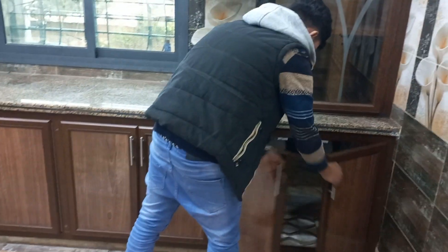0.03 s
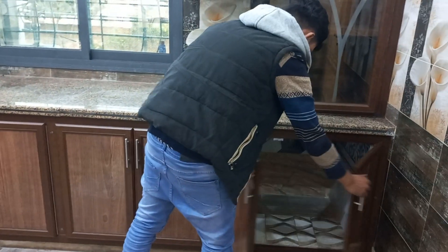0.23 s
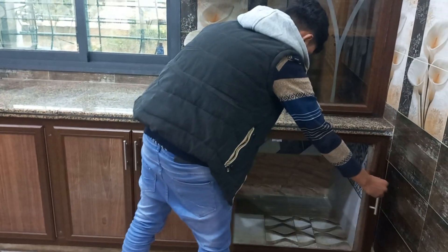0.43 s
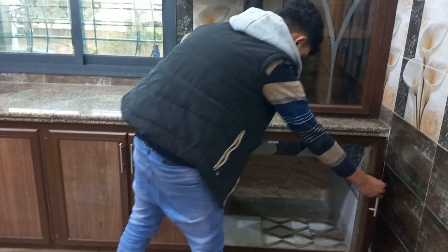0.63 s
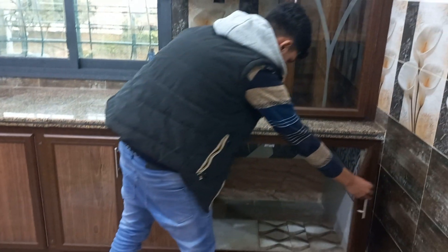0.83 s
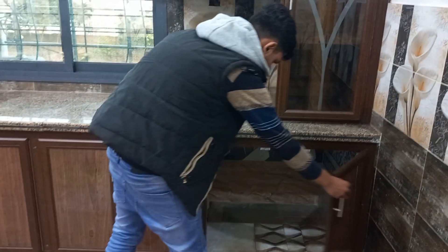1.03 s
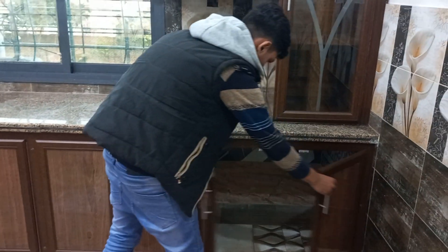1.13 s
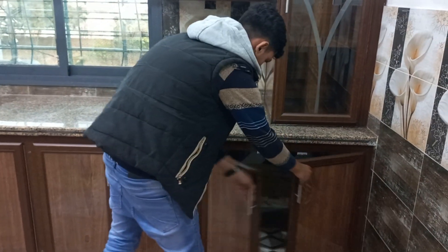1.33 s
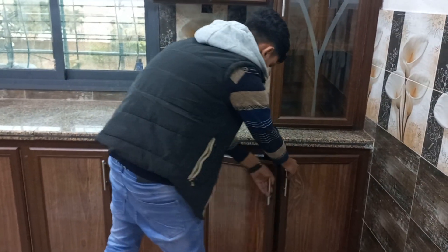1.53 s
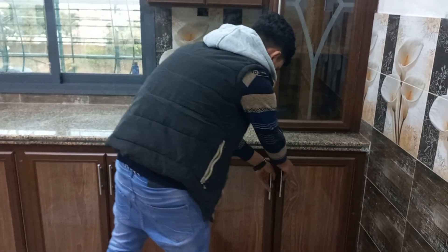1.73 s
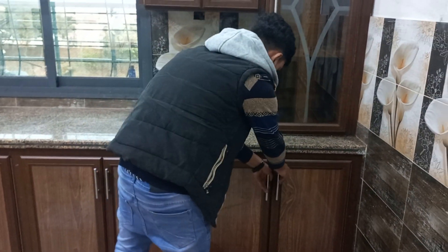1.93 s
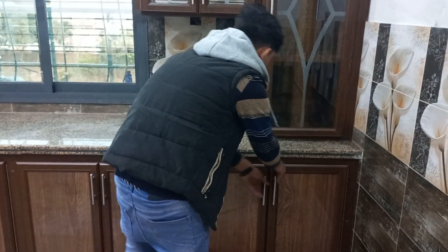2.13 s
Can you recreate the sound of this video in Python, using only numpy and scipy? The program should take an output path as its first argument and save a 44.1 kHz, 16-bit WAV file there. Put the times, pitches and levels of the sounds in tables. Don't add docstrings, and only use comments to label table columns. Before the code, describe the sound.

Cabinet doors bang open, then scrape and snap shut in quick succession in a bare tiled kitchen.

```python
import sys
import numpy as np
from scipy import signal
from scipy.fft import rfft, irfft, next_fast_len
from scipy.io import wavfile
from scipy.ndimage import uniform_filter1d

SR = 44100
rng = np.random.default_rng(int(sys.argv[2]) if len(sys.argv) > 2 else 0)


def pcm_store(signal):
    levels = np.round(np.clip(np.atleast_2d(signal), -1, 1) * 32767)
    wavfile.write(sys.argv[1], SR, levels.astype(np.int16).T)


def convert_level_to_amplitude(level_db):
    exponent = np.asarray(level_db, float) / 20
    return 10 ** exponent


N = 96579
LEAD = 8192

# t/s, crack level/dB, thud level/dB, ring level/dB, swell/s
BLOWS = [
    (-.08, -50, -42, -35.5, 0.044),
    (0.5595, -31.5, -26.5, -19.5, 0.022),
    (1.5136, -33.5, -36, -41.5, 0.02),
    (1.6891, -20.5, -29.5, -26.5, 0.0094),
    (1.883, -20, -31, -25, 0.016),
]
# delay/s, level/dB
BOUNCES = [
    [(.02, 13.5)],
    [(.0072, 6.5), (.036, -1)],
    [(.011, -6), (.017, -7)],
    [(.009, -25), (.021, -13)],
    [(.011, -18.5), (.0168, -15.5)],
]
# f/Hz, level/dB
CRACK_SPECTRA = [
    [(240, -46), (400, -12.5), (781, -23.5), (1000, -12.5), (1480, -14), (2510, -19), (2710, -24),
     (14100, -44), (16500, -61)],
    [(240, -17.5), (400, -9), (1370, -12.5), (1930, -12.5), (5380, -19), (8190, -30), (14100, -28.5),
     (15700, -40.5), (16500, -78)],
    [(240, -36), (400, -7), (546, -13), (609, -10), (1370, -20), (2150, -20), (6290, -28), (14300, -53),
     (16500, -55)],
    [(240, -67), (400, -14), (941, 5), (3880, -4.5), (4610, -8), (5300, -3), (7700, -12.5), (15300, -7),
     (16500, -84)],
    [(240, -43.5), (400, -9.5), (734, -9), (1210, -10), (1570, -7), (5300, -13.5), (8060, -22),
     (15000, -21), (16500, -65)],
]
# f/Hz, level/dB, t60/s
PANEL_MODES = [
    [(1107, -30, 0.068)],
    [(699, -36.5, 0.027), (950, -30.5, 0.027), (1206, -36, 0.022), (1652, -28.5, 0.042),
     (1943, -37.5, 0.042), (5300, -40, 0.061)],
    [(2420, -49, .03)],
    [(924, -35, 0.09), (1245, -38, 0.044), (1975, -49, 0.07), (2610, -52, 0.1), (3103, -30.5, 0.024),
     (3920, -31.5, 0.028), (5050, -37, .035), (6500, -46, 0.036)],
    [(738, -41, 0.1), (1010, -35, 0.026), (1670, -30.5, 0.025), (2397, -35.5, 0.036), (3060, -32, 0.018),
     (4030, -57, .03), (5100, -48, .015)],
]
# f/Hz, level/dB
THUD_SPECTRUM = [(30, -39), (50, -6), (120, -5), (250, 1.5), (400, -6.5), (700, -34.5)]
# f/Hz, level/dB, t60/s
RING_EARLIER = [(59.65, 1.5, 0.98), (61.8, 8, 0.65), (75.7, 8, 0.4), (142, 1.5, 0.86), (1090, -13, 0.62),
                (204.7, -10, 1.4), (268.6, -1, 0.86), (239, -20, 0.9), (308, -12.5, 1.3), (358, -1, 0.81)]
RING_OPEN = [(52, -16, 0.76), (99.4, -10, 0.59), (138.3, 6, 0.59), (148.2, -9, 1), (217, -8.5, 0.88),
             (243.7, -0.5, 0.67), (263, -1, 0.16), (318.6, -2, 0.65), (352.4, -7.5, 0.77),
             (354.4, -16, 0.67), (433, -26, .8)]
RING_CATCH = [(62.4, -10, .5), (131.4, 1, 0.46), (146.9, 14.5, 0.77), (212, -20, 0.75), (242, 9, 0.63),
              (620, -23, 0.67), (790, -26, 0.34)]
RING_FIRST = [(54, 4.5, 1), (73.8, -6, 0.73), (133, -6, 1.7), (146.2, 5.5, 0.19), (212.5, 4.5, 0.47),
              (245.7, -2.5, 0.57), (348, -21, 0.082), (395, -33, 0.13)]
RING_SECOND = [(51, -31, 1), (64.3, -1.5, 1), (73.74, 15.5, 0.43), (138.6, 7, 0.42), (157, 0, 0.41),
               (207, -27, 0.42), (251, -9, 0.28), (289, 4, 0.43), (553, -20, 0.76), (749, 5, 0.24),
               (956, -2, .12)]
LOW_MODES = [RING_EARLIER, RING_OPEN, RING_CATCH, RING_FIRST, RING_SECOND]
# delay/s, ring level change/dB
STILLED = [
    (0.505, -13),
    (0.574, -17),
    (.5, 2),
    (0.47, 1),
    (.5, -3),
]
# t/s, level/dB, f/Hz, width/Hz, room
# level/dB
TICKS = [(.099, -44, 4900, 1960, 6.5), (.099, -61.5, 10000, 6000, 13), (0.1, -58, 2700, 910, 15.5),
         (0.304, -48.5, 1550, 560, 4.5), (.318, -58, 4400, 1400, 5), (0.51, -58.5, 880, 20, -12),
         (0.4955, -57, 2030, 230, 0), (.5295, -60, 5000, 1200, -13), (0.866, -69.5, 11300, 6000, 15.5),
         (0.161, -39, 235, 50, -3.5), (1.212, -62, 420, 120.6, -4), (1.33, -67.5, 390, 600, 4.5),
         (0.83, -61.5, 780, 32, -6), (1.463, -57.5, 520, 500, 12.5), (1.4757, -48.5, 1240, 1300, 10.5),
         (1.894, -26, 13500, 2700, -3), (0.566, -31.5, 2010, 500, 11.5), (.569, -41.5, 4300, 505, 15),
         (1.69, -37.5, 4080, 800, 14.5), (1.886, -29, 1050, 500, 7), (.4951, -66, 5600, 2500, -18),
         (.789, -70, 12500, 5000, -12), (1.886, -30.5, 13600, 2000, 6), (1.4892, -58.5, 3600, 4000, 10),
         (1.531, -46.5, 12000, 5000, 1), (1.8995, -22.5, 2550, 650, 1), (1.902, -29.5, 5100, 530, 3),
         (1.884, -26, 1080, 460, 0), (1.9, -18.5, 882, 180, -2), (0.17, -55.5, 450, 140, 1),
         (0.0293, -29, 69.4, 11.7, -12), (.05, -39, 262, 24, -8), (.28, -45.5, 69, 8, -12)]
# t/s, level/dB
RUSTLE_EFFORT = [
    (0, -70),
    (.55, -75),
    (.7, -47),
    (.8, -51),
    (.95, -71),
    (1.2, -76),
    (1.245, -63.5),
    (1.37, -64),
    (1.451, -66),
    (2.2, -75),
]
# f/Hz, level/dB
CLOTH_SPECTRUM = [(800, -48), (1500, 4), (3000, -1), (6500, -5.5), (8500, -9), (14000, -9.5), (16500, -19)]
# t/s, level/dB
SLIPS = [
    (1.482, -41.5),
    (1.494, -41),
    (1.534, -30),
    (1.566, -31.5),
    (1.577, -43.5),
    (1.615, -34),
    (1.649, -39),
    (1.676, -48),
]
# f/Hz, level/dB, t60/s
SLIP_MODES = [(359.3, 10, 0.089), (266.6, 8.5, 0.064), (990, -16.5, 0.11), (544, -4.5, 0.069)]
# f/Hz, level/dB
AIR_SPECTRUM = [(24, -36), (40, -22), (137, -1), (744, -14.5), (1580, -6.5), (5730, -11), (8500, -22),
                (15300, -32), (16500, -45.5)]
# f/Hz, t60/s
ROOM_DECAY = [(60, 0.39), (200, 0.84), (500, 0.69), (1200, 0.61), (3000, 0.67), (6000, 0.56), (9000, 0.41),
              (14000, 0.32)]
# f/Hz, likeness/1
LIKENESS = [(60, 0.69), (250, 0.96), (500, 0.67), (1000, 0.022), (3000, -0.1), (12000, 0.0091)]
# f/Hz, left minus right/dB
LEAN = [(60, 3), (150, 3.5), (380, 0), (950, 0.5), (2380, -6.5), (5980, -4.5), (15000, 4.5)]
# f/Hz, level/dB
MIC_RESPONSE = [(2800, -1), (3400, -2), (4100, -1.5), (6700, 1), (7500, -4), (11000, -2.5)]


def evened(x):
    return x / np.sqrt(np.mean(x ** 2) + 1e-20)


def read(points, hz):
    f, value = np.transpose(points)
    return np.interp(np.log(hz + 1), np.log(f + 1), value)


def overlay(base, sound, start=0):
    part = base[..., start:][..., :sound.shape[-1]]
    part += sound[..., :part.shape[-1]]


def at_time(t_s):
    return LEAD + round(t_s * SR)


def microphones(two):
    size = two.shape[1]
    hz = np.fft.rfftfreq(size, 1 / SR)
    same = read(LIKENESS, hz)
    lean = convert_level_to_amplitude(read(LEAN, hz) / 2)
    a, b = rfft(two) * convert_level_to_amplitude(read(MIC_RESPONSE, hz))
    mid = np.sqrt((1 + same) / 2) * a
    side = np.sqrt((1 - same) / 2) * b
    return irfft(np.array([(mid + side) * lean, (mid - side) / lean]), size)


def impact_pulse(points):
    hz = abs(np.fft.fftfreq(4096, 1 / SR))
    log_gain = np.log(convert_level_to_amplitude(read(points, hz)))
    pulse = np.fft.ifft(np.exp(np.conj(signal.hilbert(log_gain)))).real[:2048]
    return pulse / np.linalg.norm(pulse)


def room(x, swell_s, wet_db, direct_db):
    taps = rng.standard_normal((2, SR))
    hz, t, z = signal.stft(taps, SR, nperseg=256, noverlap=192)
    decay = convert_level_to_amplitude(-60 * t / read(ROOM_DECAY, hz)[:, None])
    tail = signal.istft(z * decay, SR, nperseg=256, noverlap=192)[1][:, :SR]
    tail = tail * (1 - np.exp(-np.arange(SR) / SR / swell_s))
    tail = convert_level_to_amplitude(wet_db) * tail / np.linalg.norm(tail[0])
    tail[0, 0] = convert_level_to_amplitude(direct_db)
    heard = microphones(np.pad(tail, ((0, 0), (64, 960))))[:, 64:]
    return signal.fftconvolve(x[None], heard, axes=1)


def ring(modes, rise_s, length_s):
    t = np.arange(0, length_s, 1 / SR)
    hz, db, t60_s = np.transpose(modes)[:, :, None]
    swell = (1 - np.exp(-t * hz / 150 / rise_s)) ** 2
    return (convert_level_to_amplitude(db - 60 * t / t60_s) * np.sin(2 * np.pi * hz * t) * swell).sum(0)


def noise(points):
    size = next_fast_len(N + LEAD)
    gain = convert_level_to_amplitude(read(points, np.fft.rfftfreq(size, 1 / SR)))
    z = rfft(rng.standard_normal((2, size))) * gain
    return evened(microphones(irfft(z, size))[:, :N + LEAD])


def wander(samples):
    return evened(uniform_filter1d(rng.standard_normal(N + LEAD), size=samples))


def door_blow(crack_db, thud_db, ring_db, swell_s, bounces, spectrum, panel_modes, low_modes, stilled):
    contacts = np.zeros(4096)
    for delay_s, db in [(0.00024, 0.0048)] + bounces:
        contacts[round(delay_s * SR)] = convert_level_to_amplitude(db)
    size = np.sqrt(SR / 10)
    pulse = ring(panel_modes, 1e-3, 0.1)
    overlay(pulse, impact_pulse(spectrum))
    out = size * convert_level_to_amplitude(crack_db) * room(np.convolve(contacts, pulse), 0.0013, wet_db=0, direct_db=-23)

    low = size * convert_level_to_amplitude(thud_db) * room(impact_pulse(THUD_SPECTRUM), swell_s, wet_db=0, direct_db=-30)[:, :SR]
    overlay(low, convert_level_to_amplitude(ring_db) * ring(low_modes, swell_s, 1.2) * convert_level_to_amplitude([[.7], [-.7]]))
    delay_s, change_db = stilled
    grip = (1 + np.tanh((np.arange(SR) / SR - delay_s) / 0.014)) / 2
    overlay(out, low * convert_level_to_amplitude(change_db * grip))
    return out


def room_air():
    return convert_level_to_amplitude(-64.5 + 0.88 * wander(4000)) * noise(AIR_SPECTRUM)


def machine_hum():
    centre_hz, width_hz = 141, 12
    z = rfft(rng.standard_normal(N + LEAD))
    off = (np.fft.rfftfreq(N + LEAD, 1 / SR) - centre_hz) / width_hz
    return convert_level_to_amplitude(-80) * evened(irfft(z * np.exp(-off ** 2), N + LEAD))


def metal_tick(db, hz, width_hz, wet_db):
    t = np.arange(12000) / SR
    decay = np.exp(-np.pi * width_hz * t)
    click = decay * (1 - decay) ** 2 * np.sin(2 * np.pi * hz * t)
    return 20 * convert_level_to_amplitude(db) * room(click / np.linalg.norm(click), 0.0037, wet_db, direct_db=0)


def jacket_rustle():
    t = (np.arange(N + LEAD) - LEAD) / SR
    effort_db = np.interp(t, *np.transpose(RUSTLE_EFFORT))
    return convert_level_to_amplitude(effort_db + 1.5 * wander(300)) * noise(CLOTH_SPECTRUM)


def door_drag():
    plucks = np.zeros(N + LEAD)
    for t_s, db in SLIPS:
        overlay(plucks, 4 * convert_level_to_amplitude(db) * ring(SLIP_MODES, 0.011, 0.3), at_time(t_s))
    return room(plucks, 0.037, wet_db=-11, direct_db=0)[:, :N + LEAD]


def scene():
    mix = room_air() + machine_hum() + jacket_rustle() + door_drag()
    for (t_s, *levels), *parts in zip(BLOWS, BOUNCES, CRACK_SPECTRA, PANEL_MODES, LOW_MODES, STILLED):
        overlay(mix, door_blow(*levels, *parts), at_time(t_s))
    for t_s, *settings in TICKS:
        overlay(mix, metal_tick(*settings), at_time(t_s))
    return mix[:, LEAD:]


def top_cut(x):
    return signal.sosfilt(signal.butter(12, 16830, fs=SR, output="sos"), x)


def record(dry):
    limit_db, squeeze, recover_db_per_s = -17.5, 0.12, 17.5
    power = abs(uniform_filter1d((dry ** 2).mean(0), size=200))
    power_db = 10 * np.log10(power + 1e-12)
    fall_db = np.arange(N) * recover_db_per_s / SR
    peak_db = np.maximum.accumulate(power_db + fall_db) - fall_db
    over_db = np.maximum(peak_db - limit_db, 0)
    held = dry / convert_level_to_amplitude(squeeze * uniform_filter1d(over_db, size=100))
    low_pass = signal.firwin(255, 16000, window=("kaiser", 8), fs=SR)
    return top_cut(signal.oaconvolve(held, low_pass[None], "same"))


dry = scene()
out = record(dry)
pcm_store(out)
```